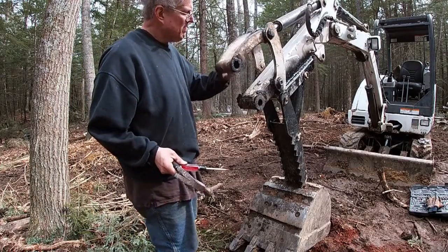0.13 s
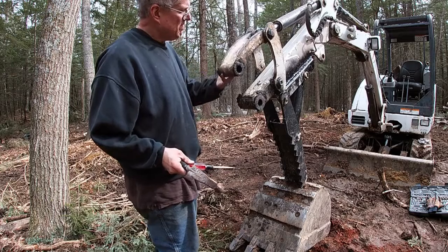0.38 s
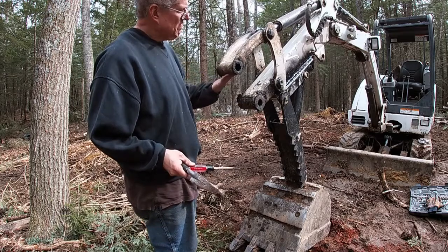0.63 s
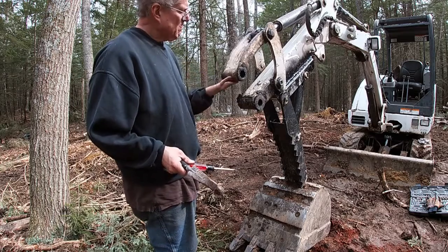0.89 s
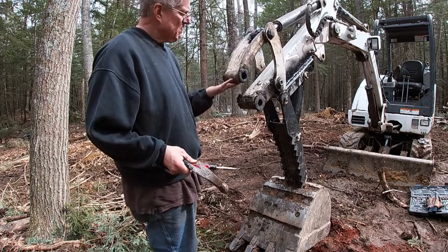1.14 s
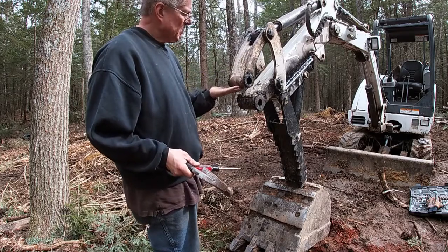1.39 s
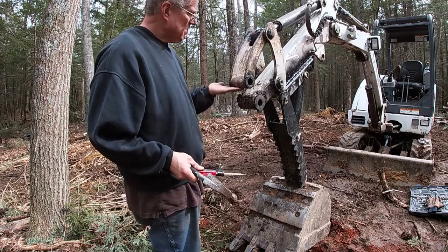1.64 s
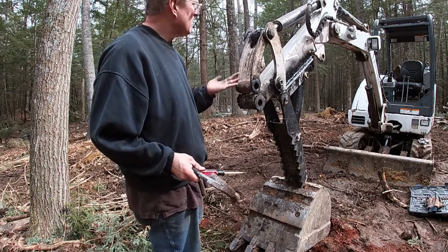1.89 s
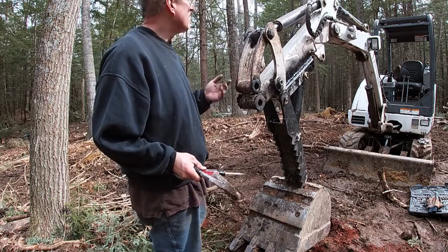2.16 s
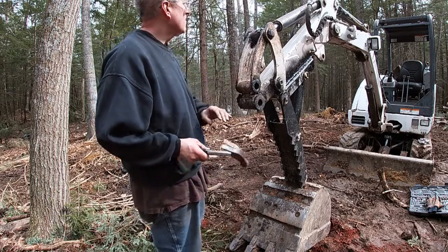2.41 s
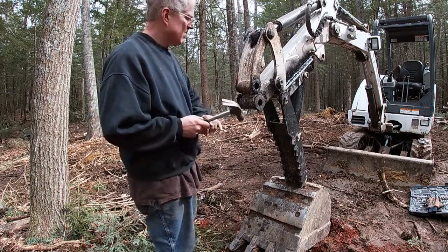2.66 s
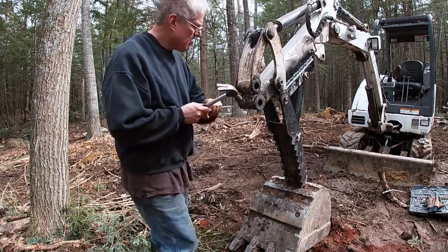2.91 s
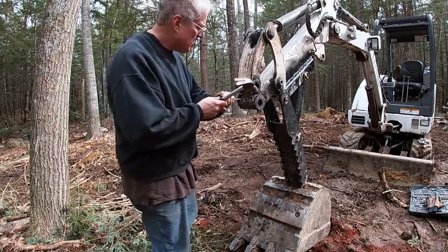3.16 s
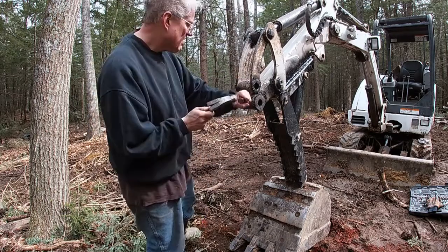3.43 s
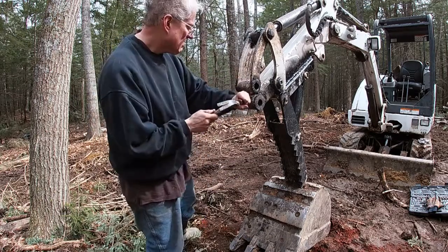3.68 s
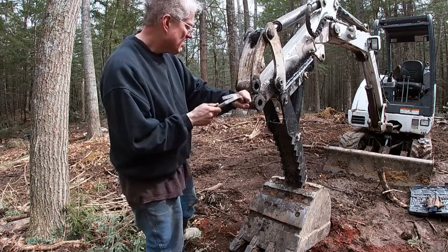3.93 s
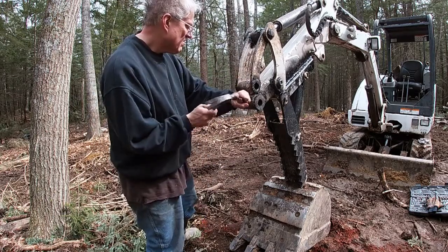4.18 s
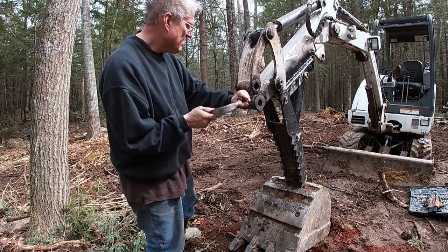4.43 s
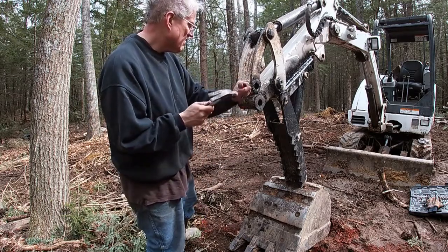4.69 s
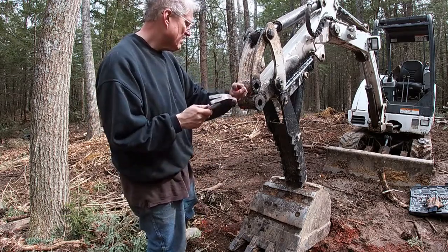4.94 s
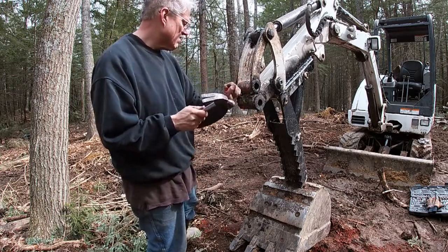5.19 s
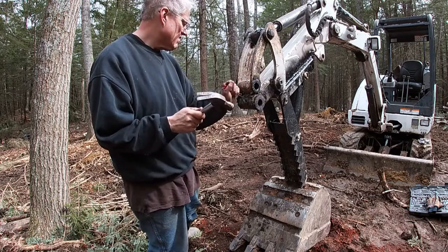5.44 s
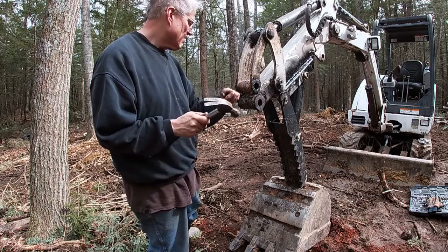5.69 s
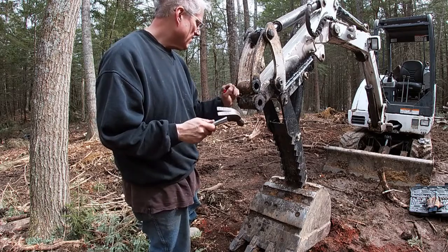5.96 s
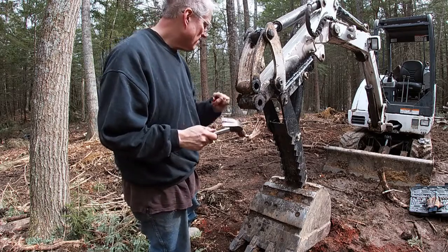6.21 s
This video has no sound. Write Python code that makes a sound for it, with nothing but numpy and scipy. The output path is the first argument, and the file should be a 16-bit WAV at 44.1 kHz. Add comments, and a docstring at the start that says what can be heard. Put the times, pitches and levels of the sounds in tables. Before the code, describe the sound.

A quiet forest clearing, heard close to the work: soft, low-weighted air noise, a faint distant machinery hum and a very weak insect buzz throughout. From 0.3 to 1.8 seconds, cloth and litter rustle lightly, with tiny twig ticks near 0.5 and 1.4. Just before 2.0 a brief steel hiss swells into a loud, hard clang as a link drops on the boom, its double edge rattling; a weaker bounce follows at 2.05. The steel rings for a fraction of a second over a low thud, and the trunks return a diffuse tail. Small snaps come around 2.5 to 2.6, then a leafy step crunches from 3.0 to 3.4 with crisp twig cracks. Hammer taps land at 3.7, 4.05 and 4.35, sharp and short, the first softer. A far bird chirps thinly at 4.8 and whistles from 5.4 to 6.0. Pliers snap sharply, twice in quick succession, around 6.15.

```python
"""A steel link of a small digger slides, drops against its boom and bounces: decaying modes excited by clicks.
Later a hammer taps a pin three times, likewise ringing the boom, and pliers snap as clicks in resonances.
The trunks of a forest scatter each blow into a short tail of banded noise.
Cloth, litter and twigs are grains and short rings; an insect buzzes in noise bursts and a far bird
whistles gliding sines, all over coloured noise and a distant hum."""
import sys
import numpy as np
from scipy import signal
from scipy.io import wavfile

SR = 44100
rng = np.random.default_rng(int(sys.argv[2]) if len(sys.argv) > 2 else 0)


def put_to_file(sound):
    """Save the sound as 16-bit audio at rate SR, in the file named by the first command-line argument."""
    columns = np.atleast_2d(sound).T  # one column per channel
    safe = np.clip(columns, -1, 1)
    whole_steps = np.round(safe * 32767)
    wavfile.write(sys.argv[1], SR, whole_steps.astype(np.int16))


def volts(x):
    """Linear amplitude factor 10**(x/20) for a level x in dB, scalar or array-like."""
    e = np.asarray(x, float) / 20
    return 10 ** e


N = 279285

# Spectrum of the air noise. Each row: frequency in Hz, relative density in dB per Hz.
AIR_SPECTRUM = [(15, -37), (25, -6.5), (71, -0.5), (115, -13), (172, -5), (326, -12), (354, -13.5),
                (415, -8.5), (475, -16), (604, -15), (769, -14.5), (2180, -34.5), (6040, -26),
                (7090, -28.5), (15000, -58.5)]
# Course of the air noise. Each row: time in seconds, level in dB before a common lift.
AIR_COURSE = [(0, -66.5), (1.9, -67.5), (2.5, -69.5), (3.42, -67), (3.45, -64), (4.9, -69.5), (6.33, -62.5)]
# Far machinery. Each row: centre in Hz, width in Hz, level in dB.
MACHINE_HUMS = [(171, 29, -69), (733, 230, -71)]
# Wing strokes. Each row: time in seconds, pulses per second, level in dB.
WING_STROKES = [(0.0, 60, -74.5), (6.33, 60, -77)]
# Notes of the far bird. Each row: start in seconds, length in seconds, top frequency in Hz, level in dB.
BIRD_NOTES = [(4.792, 0.027, 5350, -74), (5.368, 0.19, 5820, -76), (5.56, .1, 6000, -72),
              (5.68, .05, 5800, -74), (5.95, .11, 5530, -73.5)]
# Puffs of cloth and litter. Each row: peak in seconds, length in seconds, level in dB, centre in Hz, width in Hz.
RUSTLE_PUFFS = [(0.281, .1, -62, 3400, 6500), (0.488, 0.059, -69, 5000, 6000),
                (0.733, 0.49, -70.5, 4700, 2400), (0.975, 0.28, -64.5, 5000, 2600),
                (1.342, 0.23, -66.5, 5300, 3500), (1.452, 0.23, -77, 6000, 5000),
                (1.654, 0.15, -70, 6500, 5000), (1.805, 0.19, -66.5, 6000, 6000),
                (2.58, 0.49, -71.5, 5000, 3890), (2.78, 0.4, -71.5, 3500, 3004),
                (5.141, .037, -69, 2990, 3986), (6.124, .3, -74, 5000, 2000)]
# A step through leaf litter. Each row: time in seconds, level in dB.
FOOTSTEP_COURSE = [(2.941, -75.5), (2.975, -65), (3.04, -55), (3.11, -56.5), (3.14, -60), (3.2, -62.5),
                   (3.27, -60), (3.32, -67.5), (3.424, -60.5), (3.43, -99)]
# Spectrum of that step. Each row: frequency in Hz, relative density in dB per Hz.
FOOTSTEP_SPECTRUM = [(240, -35), (400, -5.5), (734, -1), (791, -5.5), (964, 0.5), (4260, -1), (5600, 1),
                     (7810, -13), (10300, -10.5), (15000, -29.5)]
# Snapping twigs. Each row: start in seconds, level in dB, frequency in Hz.
TWIG_SNAPS = [(.4894, -60, 3970), (1.42, -56, 9600), (2.493, -52.5, 5240), (2.637, -49, 5600),
              (3.012, -46, 3700), (3.091, -40.5, 4770), (3.112, -53, 5600), (3.17, -50, 9470),
              (3.376, -48, 5200)]
# Ticks of a tool. Each row: start in seconds, level in dB, frequency in Hz, t60 in seconds.
TOOL_TICKS = [(3.2277, -35.5, 1570, .0038)]
# Scattering by the trunks. Each row: frequency in Hz, t60 in seconds, relative level in dB.
FOREST_TAIL = [(60.22, 0.35, -31), (247.5, 0.65, -23.5), (537, 0.99, -22.5), (800, 1, -17.5),
               (1400, 0.98, -20.5), (1770, .93, -21), (2250, 0.83, -16), (2730, 1, -26), (3400, 1, -21.5),
               (5000, 0.87, -19), (7112, 0.75, -17.5), (14000, 0.32, -25)]
# Slips of the pliers. Each row: time in seconds, scraping strength in dB.
JAW_SLIPS = [(6.149, -32), (6.168, -42)]
# Catches of the jaws. Each row: start in seconds, level in dB, frequency in Hz.
JAW_CATCHES = [(6.1304, -45, 5000), (6.1443, -21.5, 2950), (6.146, -27.5, 3500), (6.1493, -28, 4600),
               (6.1654, -33.5, 2670), (6.169, -35, 3400)]
# Broad resonances of the jaws. Each row: frequency in Hz, width in Hz, relative gain in dB.
JAW_RESONANCES = [(635, 160, -6), (1310, 730, -1), (3200, 1100, 2), (5100, 590, 2.5), (7250, 1400, -4.5),
                  (9800, 2200, -14.5), (12500, 2300, -33.5)]
# Main modes of the steel boom. Each row: frequency in Hz, gain in dB from the link, gain in dB from the pin,
# t60 in seconds.
STEEL_MODES = [(302.6, -19.5, -14, 0.11), (380, -14.5, -12.5, 0.05), (603, -6, -27, 0.22),
               (653, -17, -26.5, 0.11), (735, -35, -51.5, 2.0), (753, -11.5, -30.5, 0.13),
               (837, -13, -23.5, 0.22), (907.7, -15, -34, 0.24), (1010, -15, -26.5, 0.24),
               (1192, -23, -35.5, 0.28), (1428, -17.5, -19.5, 0.15), (1515.5, -21, -54, 0.23),
               (1764, -18, -15.5, .12), (1920, -29.5, -21.5, 0.16), (2698, -18.5, -41.5, .15),
               (3064, -27, -46, 0.44), (3295, -21, -44, .15), (3780, -24, -46.5, .17),
               (4452, -25, -57.5, 0.16), (4440, -25.5, -37.5, .15), (4905, -22, -52, 0.17),
               (5030, -26.5, -52, .17), (8900, -31.5, -59, 0.15), (10200, -37, -61.5, 0.17),
               (11600, -42, -64, .12), (5965, -34.5, -50, .15), (8250, -31.5, -51, .2),
               (8290, -32, -64.5, 0.23), (8455, -36, -58.5, .15), (8450, -49.5, -55, .3)]
# Crowd of minor modes. Each row: frequency in Hz, t60 in seconds, mean gain in dB from the link,
# mean gain in dB from the pin.
MINOR_MODES = [(150, 0.13, -24.5, -17.5), (347, 0.18, -28, -22.5), (800, 0.13, -26.5, -33),
               (1700, 0.2, -31.5, -31), (3500, 0.21, -36.5, -46), (5543, .22, -38.5, -49.5),
               (7400, 0.16, -45.5, -45.5), (11800, 0.11, -58, -72.5)]
# Hammer on the pin. Each row: start in seconds, crack strength in dB, crack pitch in Hz,
# boom drive in dB over the crack strength, thud drive in dB over the crack strength.
PIN_TAPS = [(3.725, -12, 1400, -27, -27.5), (4.046, -6.5, 1976, -21.5, -24.5),
            (4.364, -6.5, 1700, -20, -21)]
# Steel sliding on steel. Each row: frequency in Hz, width in Hz, relative gain in dB.
SLIDE_RESONANCES = [(2400, 700, -2), (4600, 1500, -0.5), (8500, 4000, -5)]
# Broad resonances of the rattling joint. Each row: frequency in Hz, width in Hz, gain in dB.
RATTLE_RESONANCES = [(714, 460, -0.5), (1500, 620, -2.5), (2800, 470, -4.5), (5050, 1300, -15),
                     (8300, 1800, -28)]
# Link on the boom. Each row: start in seconds, strength in dB, knock pitch of the first edge in Hz,
# lag of the second edge in seconds, boom drive in dB.
LINK_DROPS = [(1.986, -0.5, 800, 0.0083, -16), (2.050, -12, 596, .012, -22.5)]


def rms_one(x):
    """Normalization: a signal divided by its root mean square has unit power."""
    return x / np.sqrt(np.mean(x ** 2) + 1e-20)


def in_time(rows):
    """Linear interpolation: a sparse curve becomes one value per sample for each column."""
    s, *columns = np.transpose(rows)
    return [np.interp(np.arange(N) / SR, s, c) for c in columns]


def at_hz(points, hz, axis=1):
    """Logarithmic frequency: a table is interpolated by musical interval."""
    return np.interp(np.log(hz), np.log(np.array(points)[:, 0]), np.array(points)[:, axis])


def drift(rate):
    """Low-pass noise: two equal poles at `rate` Hz leave a slow random course of about unit spread."""
    hop = 40  # samples between computed points
    settle = 2000  # points dropped while the filter settles
    r = np.exp(-2 * np.pi * rate * hop / SR)
    noise = rng.standard_normal(N // hop + settle + 2)
    slow = signal.lfilter([1], [1, -2 * r, r * r], noise)[settle:]
    return np.interp(np.arange(N) / hop, np.arange(len(slow)), rms_one(slow))


def ring(clicks, hz, t60):
    """Impulse response of a damped oscillator: a unit click starts a decaying sine of height 1."""
    r, w = np.exp(-np.log(1000) / (t60 * SR)), 2 * np.pi * hz / SR
    return signal.lfilter([0, np.sin(w)], [1, -2 * r * np.cos(w), r * r], clicks + 1e-18)


def resonances(x, table):
    """Parallel resonators: each passes a band about its peak; alternating signs set neighbours in opposition."""
    out = 0
    for k, (hz, width_hz, db) in enumerate(table):
        r = np.exp(-np.pi * width_hz / SR)
        a = [1, -2 * r * np.cos(2 * np.pi * hz / SR), r * r]
        out = out + (-1) ** k * volts(db) * signal.lfilter([(1 - r * r) / 2, 0, (r * r - 1) / 2], a, x)
    return out


def click(s, db):
    """Impulse: all of a blow's drive falls in one sample."""
    out = np.zeros(N)
    out[round(s * SR)] = volts(db)
    return out


def later(x, s):
    """Propagation delay: the signal is shifted by s seconds, earlier if negative."""
    return np.roll(x, round(s * SR))


def low_pass(x, cut_hz):
    """Second-order low-pass: the spectrum falls by 12 dB per octave well above the cut."""
    return signal.sosfilt(signal.butter(2, cut_hz, fs=SR, output="sos"), x)


def fading(clicks, t60):
    """Exponential decay: each click starts an envelope that falls 60 dB in t60 seconds."""
    return signal.lfilter([1], [1, -volts(-60 / (t60 * SR))], clicks)


def grains(per_s, spread_db):
    """Shot noise: independent clicks of uneven size and sign, with unit rms."""
    sizes = volts(spread_db * np.minimum(rng.exponential(1, N), 4)) * rng.choice([-1, 1], N)
    return rms_one(sizes * (rng.random(N) < per_s / SR))


def bands(sources):
    """Filter bank: yields centre in Hz and band signal, neighbours drawing on unrelated sources."""
    edges = 25 * 2 ** np.arange(0, 9.4, .4)
    for k, (low, high) in enumerate(zip(edges, edges[1:])):
        sos = signal.butter(2, [low, high], "band", fs=SR, output="sos")
        yield np.sqrt(low * high), signal.sosfilt(sos, sources[k % 2])


def air():
    """Broadband noise: far traffic and leaves, lumpier in the bass, with two narrow noise bands as wavering hums."""
    db, = in_time(AIR_COURSE)
    white = rng.standard_normal((3, N))
    wide = 0
    for hz, band in bands(white):
        lumps_db = 4.1 * drift(1.8) * min(1, 300 / hz)
        wide = wide + volts(at_hz(AIR_SPECTRUM, hz) + lumps_db) * band
    hum = sum(volts(hum_db) * rms_one(resonances(white[2], [(hz, width_hz, 0)]))
              for hz, width_hz, hum_db in MACHINE_HUMS)
    return volts(db + 1.0) * rms_one(wide) + hum


def insect():
    """Amplitude modulation: wing strokes gate resonant noise into short uneven bursts."""
    per_s, db = in_time(WING_STROKES)
    phase = np.cumsum(per_s) / SR + 0.023 * drift(18)  # in strokes
    burst = np.exp(2.4 * (np.cos(2 * np.pi * phase) - 1)) * volts(0.935 * drift(30))
    body = resonances(rng.standard_normal(N), [(6400, 1700, 0)])
    tone = resonances(body, [(6500, 1100, 0)])
    return volts(db) * rms_one(burst * tone)


def bird():
    """Frequency modulation: each thin whistle climbs to its top, then sags, wavering from the distance."""
    arch_hz, top_share = 149.8, 0.558  # depth of the arch; where in the note its top lies
    out, waver = np.zeros(N), volts(3.5 * drift(40))
    wobble_hz = 35 * drift(60)
    for s, length, top_hz, db in BIRD_NOTES:
        start = round(s * SR)
        share = np.linspace(0, 1, round(length * SR))
        pitch_hz = top_hz - arch_hz * (share / top_share - 1) ** 2
        phase = 2 * np.pi * np.cumsum(pitch_hz + wobble_hz[start:][:len(share)]) / SR
        swell = np.sqrt(2 * np.sin(np.pi * share).clip(0))
        out[start:][:len(share)] += volts(db) * swell * np.sin(phase)
    return out * waver


def puffs():
    """Friction as shot noise: cloth and litter give flickering fine grains, each puff with its own colour."""
    rise_share, flicker_db = .42, 1.8
    fine = grains(7000, spread_db=3.0) * volts(flicker_db * drift(29))
    out = np.zeros(N)
    for peak_s, length, db, hz, width_hz in RUSTLE_PUFFS:
        rise, fall = rise_share * length, (1 - rise_share) * length
        start = round((peak_s - rise) * SR)
        shape = np.r_[np.linspace(0, 1, round(rise * SR)), np.linspace(1, 0, round(fall * SR))][:N - start]
        part = slice(start, start + len(shape))
        colour = [(hz, width_hz, 0)]
        mixed = 0.42 * fine[part] + resonances(fine[part], colour)
        out[part] += volts(db) * shape * rms_one(resonances(mixed, colour))
    return out


def footstep():
    """Crushing as shot noise: coarse grains in independently flickering bands crunch under a step."""
    step_db, = in_time([(0, -120)] + FOOTSTEP_COURSE + [(N / SR, -120)])
    coarse = [grains(6300, spread_db=5.0), grains(5000, spread_db=5.0)]
    crunch = sum(volts(at_hz(FOOTSTEP_SPECTRUM, hz) + 2.6 * drift(20)) * band
                 for hz, band in bands(coarse) if hz > 400)
    return volts(step_db) * rms_one(crunch)


def twigs():
    """Brittle fracture: a click and a short ring, whose t60 lasts a fixed count of cycles in thin twigs."""
    snap_cycles = 32
    thin = [(s, db, hz, snap_cycles / hz) for s, db, hz in TWIG_SNAPS]
    return sum(ring(click(s, db), hz, t60) + click(s, db - 5.5) for s, db, hz, t60 in TOOL_TICKS + thin)


def forest(dry):
    """Multiple scattering: trunks near and far return sound as noise that swells, then dies band by band."""
    t = np.arange(SR) / SR
    tail = 0
    for hz, band in bands(rng.standard_normal((2, SR))):
        tail = tail + volts(at_hz(FOREST_TAIL, hz, axis=2) - 60 * t / at_hz(FOREST_TAIL, hz)) * band
    swell = 1 - np.exp(-t / 0.062)
    return signal.fftconvolve(dry, volts(-34.5) * tail * swell)[:N]


def pliers():
    """Stick-slip: jaws slip twice off the steel, a few ringing catches over dense clicks in resonances."""
    rise_db_per_s, fall_db_per_s = 2200, 2302.5
    tail_db, tail_db_per_s = -14.5, 515.5  # a weaker, slower part of the fall
    scrape = 0
    for s, db in JAW_SLIPS:
        t = np.arange(N) / SR - s
        rise = volts(-rise_db_per_s * abs(t))
        fall = volts(-fall_db_per_s * abs(t)) + volts(tail_db - tail_db_per_s * abs(t))
        scrape = scrape + volts(db) * np.where(t < 0, rise, fall)
    catches = sum(ring(click(s, db), hz, 0.0094) for s, db, hz in JAW_CATCHES)
    return catches + scrape * rms_one(resonances(grains(12000, spread_db=2.5), JAW_RESONANCES))


def steel(force, axis, swell_cycles):
    """Modal superposition: main modes swell as the blow spreads, then die; a crowd of weak ones fills the gaps.

    axis is the gain column of STEEL_MODES: 1 from the link, 2 from the pin."""
    modes = 0
    for mode in STEEL_MODES:
        hz, t60 = mode[0], mode[3]
        modes = modes + volts(mode[axis]) * (ring(force, hz, t60) - ring(force, hz, swell_cycles / hz))
    # The main ring is two close modes set off in opposition, so it swells and then cancels.
    twin_hz, split_hz, twin_t60 = 559, 6.3, 0.1559
    twin_db = {1: 5.5, 2: -3}[axis]
    modes += volts(twin_db) * sum(side * ring(force, twin_hz + side * split_hz / 2, twin_t60) for side in (-1, 1))
    k, t = np.arange(600), np.arange(SR // 3) / SR
    hz = (120 + 13000 * ((k + .4 * np.sin(k * k)) / 600) ** 1.6)[:, None]  # unevenly spaced modes
    level_db = at_hz(MINOR_MODES, hz, axis=axis + 1) + rng.normal(0, 3.6, hz.shape)
    t60 = at_hz(MINOR_MODES, hz) * rng.uniform(.8, 1.3, hz.shape)
    crowd = volts(level_db - 60 * t / t60) * np.sin(2 * np.pi * (hz * t + rng.random(hz.shape)))
    crowd_response = crowd.sum(axis=0) * np.minimum(t / 0.0014, 1)
    return modes + signal.fftconvolve(force, crowd_response)[:N]


def thud(force):
    """Impulse response of a heavy body: the boom jolts on its tracks, a falling thump, then a deeper shudder."""
    t = np.arange(SR // 4) / SR
    phase = 2 * np.pi * np.cumsum(102 + 100 * np.exp(-t / 0.014)) / SR
    thump = t / 0.017 * np.exp(1 - t / .012) * np.sin(phase)
    thump += volts(-20.0) * np.exp(-t / 0.036) * np.sin(phase)
    shudder = volts(-22.5) * np.exp(-((t - .105) / 0.056) ** 2) * np.sin(2 * np.pi * 70 * t)
    return signal.fftconvolve(force, thump + shudder)[:N]


def lead_tick(x, lead_s, lead_db):
    """Superposed advanced copies: a faint tick runs ahead of each blow, a fainter one ahead of that."""
    return x + volts(lead_db) * later(x, -lead_s) + volts(2.1 * lead_db) * later(x, -2 * lead_s)


def taps():
    """Impact: each tap is a short crack and bright spit, an echo off the machine, the boom ringing and thudding."""
    treble_at_1khz_db, treble_db_per_octave = -21.5, 11.5  # a squarer, higher crack is brighter
    crack, force, jolt = np.zeros((3, N))
    spit = rng.standard_normal(N)
    for s, db, hz, boom_db, thud_db in PIN_TAPS:
        treble_db = db + treble_at_1khz_db + treble_db_per_octave * np.log2(hz / 1000)
        # body of the crack
        crack -= ring(ring(click(s + 0.001384, db - 19.5), hz, 0.012), 0.64 * hz, 0.0035)
        crack -= ring(click(s + 0.00306, db - 11.0), .85 * hz, .015)
        crack += ring(click(s + .0018, db - 7), 1710, 0.0058)
        crack += ring(click(s + 0.00147, db - 15.0), 950, 0.013)
        # treble of the crack, then the noisy spit
        crack += ring(click(s + .0016, treble_db), 5410, 0.00423)
        crack += ring(click(s + 0.0025, treble_db - 5.5), 7400, 0.00495)
        fade = fading(click(s + 0.0039, treble_db - 13.5), 0.044)
        bright = resonances(fade * spit, [(5910, 4400, 0.018)])
        crack += resonances(bright, [(2960, 290, 14.0), (6000, 2500, 5)])
        force += click(s + 0.009, db + boom_db)
        jolt += click(s + 0.0011, db + thud_db)
    crack = low_pass(crack, 8500)  # the pin yields a little
    echo = volts(-17) * later(signal.lfilter([.3], [1, -.7], crack), .0185)
    crack = lead_tick(crack, lead_s=.0105, lead_db=-28) + echo
    return crack + steel(force, axis=2, swell_cycles=7.5) + thud(jolt)


def slide():
    """Sliding friction: the hiss of steel on steel swells as the link gathers speed and stops at the landing."""
    top_db, swell_db_per_s, stop_s = -54, 190, 1.978
    t = np.arange(N) / SR - stop_s
    swell = volts(top_db - swell_db_per_s * abs(t)) * (t < 0)
    return swell * rms_one(resonances(grains(9000, spread_db=1.5), SLIDE_RESONANCES))


def link():
    """Repeated impact: each edge knocks and sets the boom ringing, then the loose joint rattles."""
    edge_loss_db, edge_boom_loss_db, edge_pitch_ratio = 4, 20.5, 1.4  # the second edge against the first
    rattle_t60_s, full_cut_hz, cut_octaves_per_db = .03, 8100, 0.19  # softer contacts are duller
    boom_cut_ratio = 2.4  # the boom is struck brighter than the joint rattles
    thud_db, thud_follows = -17.5, 0.62  # dB of jolt per dB of blow
    clatter, force, jolt = np.zeros((3, N))
    chatter = grains(9000, spread_db=-3.0)
    for first_s, first_db, first_hz, lag_s, boom_db in LINK_DROPS:
        jolt += click(first_s, thud_db + thud_follows * first_db)
        for second in (False, True):
            s, db = first_s + second * lag_s, first_db - second * edge_loss_db
            hz = first_hz * edge_pitch_ratio ** second
            cut_hz = full_cut_hz * 2 ** (cut_octaves_per_db * db)
            fade = fading(click(s + .0015, db + 5.0), rattle_t60_s)
            rattle = low_pass(fade * chatter, cut_hz)
            clatter += ring(click(s + 0.0005, db - 8.0), hz, 0.014) + resonances(rattle, RATTLE_RESONANCES)
            blow = click(s + 0.00079, boom_db - second * edge_boom_loss_db)
            force += low_pass(blow + 1e-18, min(boom_cut_ratio * cut_hz, .45 * SR))
    lows = low_pass(clatter, 1500)
    clatter = clatter - lows + lead_tick(lows, lead_s=0.011, lead_db=-21.0)
    return clatter + steel(force, axis=1, swell_cycles=3.5) + thud(jolt)


def scene():
    """Linear superposition: near blows and their forest tail add to the background."""
    blows = taps() + link() + pliers()
    rustle = puffs() + footstep() + twigs()
    return (blows + forest(blows) + slide() + rustle + air() + insect() + bird())[None]


def top_cut(x):
    """Nothing passes above the cut-off."""
    return signal.sosfilt(signal.butter(12, 15620, fs=SR, output="sos"), x)


def record(dry):
    """Saturation: the microphone rolls off the treble and rounds the highest peaks."""
    dull = low_pass(dry, 12000)
    mix = 0.99 * np.tanh(dull / 0.84)
    return top_cut(mix)


dry = scene()
out = record(dry)
put_to_file(out)
```